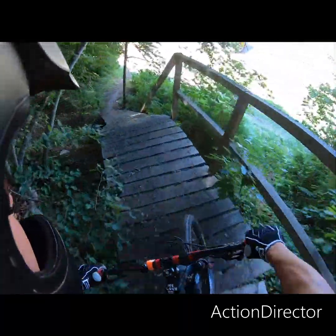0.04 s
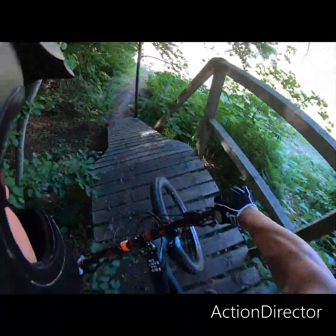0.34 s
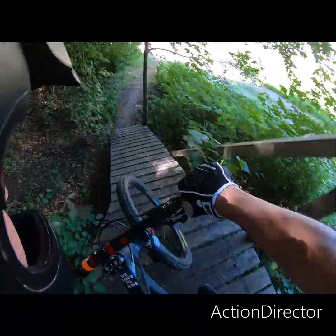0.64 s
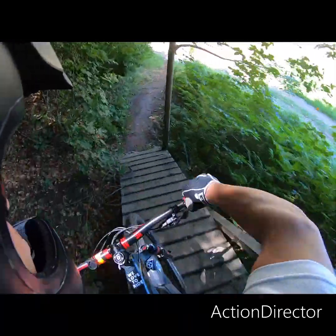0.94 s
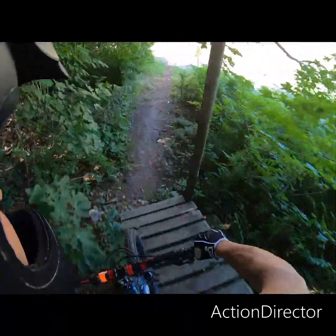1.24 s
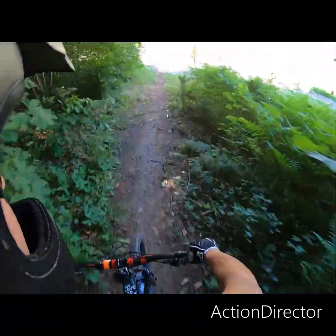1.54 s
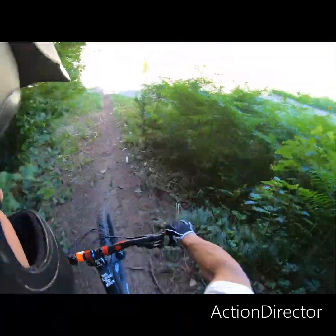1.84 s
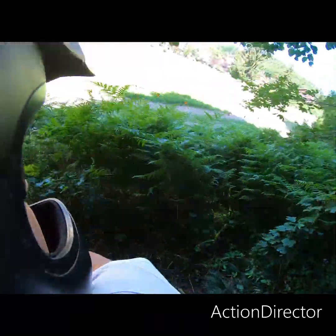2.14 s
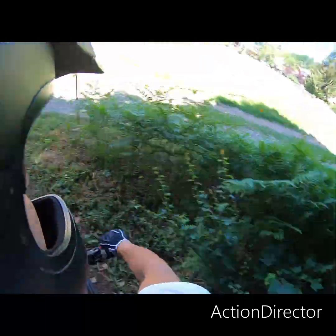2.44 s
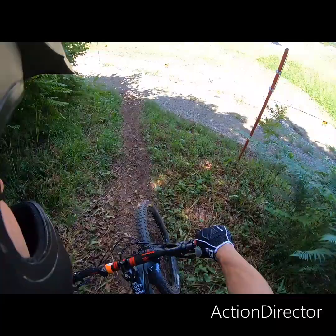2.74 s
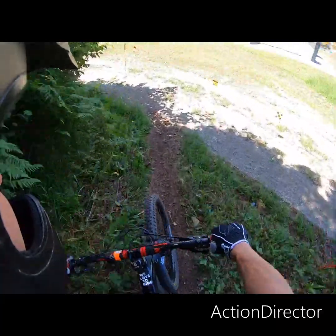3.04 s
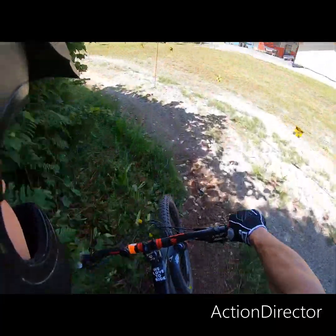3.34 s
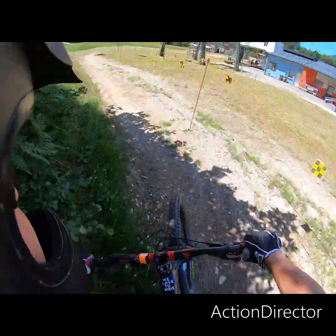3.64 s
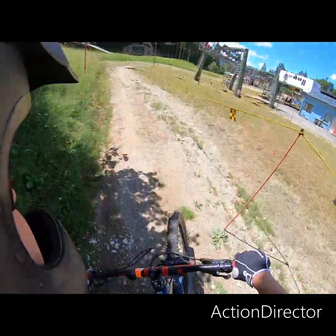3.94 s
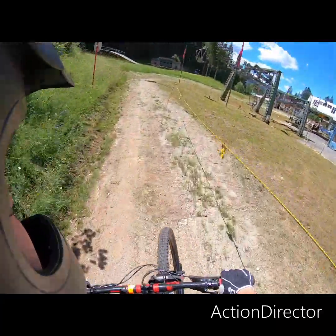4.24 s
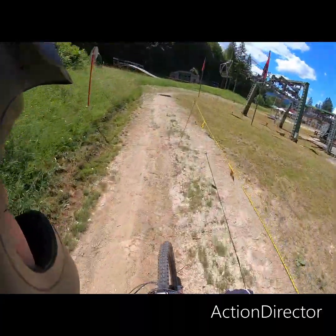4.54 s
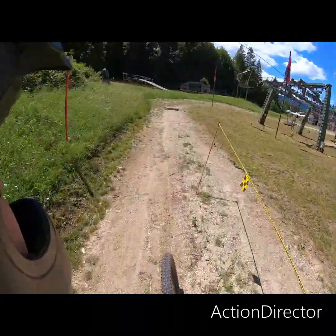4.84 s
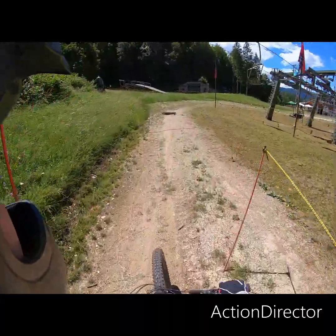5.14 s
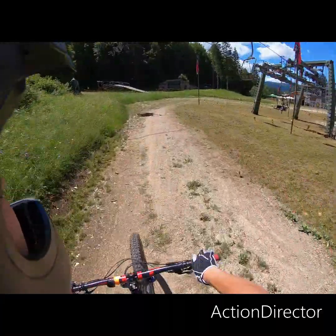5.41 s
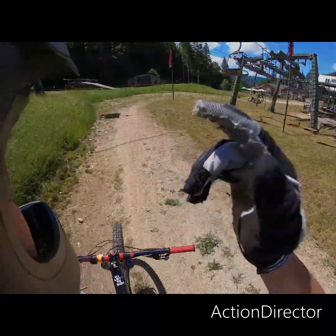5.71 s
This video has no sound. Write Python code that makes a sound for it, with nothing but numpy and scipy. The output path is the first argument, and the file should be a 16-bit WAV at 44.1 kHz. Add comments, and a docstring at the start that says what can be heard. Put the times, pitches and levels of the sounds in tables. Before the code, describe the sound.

Wind buffets a helmet microphone as a mountain bike knocks over wooden planks, clanks, then crunches along dirt and gravel.

```python
"""Wind buffets a helmet microphone while the tyres of a mountain bike hiss over a plank bridge.
The bike drops onto a dirt trail and runs out on gravel. Turbulent eddies thump, roar and rush,
higher as speed builds; the tread scrubs the ground and crunches grit. Boards and roots knock the
wheels, impacts ring the frame's metal and jangle the chain, and a few dry clicks come near the end."""
import sys
import numpy as np
from scipy import signal
from scipy.fft import rfft, irfft, next_fast_len
from scipy.io import wavfile
from scipy.ndimage import uniform_filter1d

SR = 44100
rng = np.random.default_rng(int(sys.argv[2]) if len(sys.argv) > 2 else 0)


def master(y):
    """Save y as 16-bit WAV."""
    cut = np.clip(np.atleast_2d(y).T, -1, 1)
    pcm = np.round(cut * 32767)  # scale
    wavfile.write(sys.argv[1], SR, pcm.astype(np.int16))


N = 258867
TIME = np.arange(N) / SR


def from_db(db):
    """Amplitude ratio of a level in decibels."""
    return 10 ** (np.asarray(db) / 20)


def rms_one(x):
    """Normalise to unit power."""
    return x / np.sqrt(np.mean(x ** 2) + 1e-20)


def in_time(rows):
    """Interpolate each column of a time curve at every sample."""
    s, *columns = np.transpose(rows)
    return [np.interp(TIME, s, c) for c in columns]


def colour(x, spectrum):
    """Spectral shaping to rms 1. Each row of a spectrum: frequency in Hz, relative density in dB."""
    hz, db = np.transpose(spectrum)
    size = next_fast_len(N)
    bins = np.maximum(np.fft.rfftfreq(size, 1 / SR), 1)
    gain = from_db(np.interp(np.log(bins), np.log(hz), db, right=-120))
    return rms_one(irfft(rfft(x, size) * gain, size)[:N])


def flutter(rate_hz, depth_db):
    """Random amplitude modulation: a gain of rms 1 that follows low-passed noise."""
    r = np.exp(-2 * np.pi * rate_hz / SR)
    slow = signal.lfilter([1], [1, -2 * r, r * r], rng.standard_normal(N + SR))[SR:]
    return rms_one(from_db(depth_db * np.clip(rms_one(slow), -2, 2)))


def airflow(spectrum, steady_s):
    """Stationary turbulence: noise whose power holds steady over spans longer than steady_s."""
    noise = colour(rng.standard_normal(N), spectrum)
    return noise / np.sqrt(uniform_filter1d(noise ** 2, int(steady_s * SR)) + 1e-6)


def glide(x, speed):
    """Reading a noise at a changing speed scales all its frequencies alike."""
    return np.interp(np.cumsum(speed) % N, np.arange(N), x)


def band(x, centre_hz, spread):
    """A band-pass resonance reaching a factor spread either side of its centre."""
    spread = max(spread, 1.02)
    edges = [centre_hz / spread, min(centre_hz * spread, .45 * SR)]
    return signal.sosfilt(signal.butter(1, edges, "band", fs=SR, output="sos"), x)


def low_pass(x, hz, order):
    """Attenuate everything above hz."""
    return signal.sosfilt(signal.butter(order, min(hz, .45 * SR), fs=SR, output="sos"), x)


def ring(x, hz, t60):
    """One damped mode, with the same power gain whatever its decay."""
    r, w = from_db(-60 / (t60 * SR)), 2 * np.pi * hz / SR
    return signal.lfilter([0, np.sin(w) * np.sqrt(1 - r * r)], [1, -2 * r * np.cos(w), r * r], x + 1e-18)


def snap(hz, spread):
    """One hard contact: the impulse response of a heavily damped resonance; peak 1."""
    pulse = band(band(signal.unit_impulse(SR // 30), hz, spread), hz, spread)
    pulse = low_pass(pulse, hz * 2, order=2)
    return pulse / abs(pulse).max()


def add(out, s, sound):
    """Superpose a sound from time s."""
    start = max(round(s * SR), 0)
    out[start:start + len(sound)] += sound[:N - start]


def strike(blows, modes, t60, crack_db, octave_db, attack_s):
    """Modal excitation: chattering contacts crack and ring the modes nearest their brightness."""
    out, t = np.zeros(N), TIME[:SR // 3]
    for s, db, bright_hz, chatter_s in blows:
        chatter = (1 - np.exp(-t / attack_s)) * np.exp(-t / chatter_s)
        contact = rng.standard_normal(len(t)) * chatter
        rings = np.zeros(len(t))
        for hz, mode_db in modes:
            octaves_away = abs(np.log2(hz / bright_hz))
            rings += from_db(mode_db - octave_db * octaves_away) * rms_one(ring(contact, hz, t60))
        crack = from_db(crack_db) * rms_one(band(contact, bright_hz, spread=1.45))
        sound = low_pass(rms_one(rings) + crack, 7750, order=6)
        add(out, s, from_db(db) * sound * np.sqrt(np.mean(chatter ** 2)))
    return out


def ground():
    """The surface sets the excitation; its properties blend as the wheels cross to the next stretch."""
    # Each row: start in seconds, loose stones per second, their level in dB, crunch in dB, extra
    # buffeting from the shaken head in dB. Three stretches of bridge come first, then dirt, grass,
    # loose gravel, packed gravel and sand.
    stretches = [(0, 340, -46, -41, -9.5), (0.579, 130, -48, -53, -0.5), (.95, 210, -54, -39.5, 2),
                 (1.26, 140, -54, -47, 1), (2.15, 99, -54, -66, 0), (2.78, 350, -47, -35, -0.5),
                 (3.55, 510, -50.5, -67, -6), (4.75, 170, -67, -48.5, -2.5)]
    s, *columns = np.transpose(stretches)
    blend_s = 0.037
    crossed = np.clip((TIME - s[1:, None]) / blend_s + .5, 0, 1)
    return [c[0] + np.diff(c) @ crossed for c in columns]


def wind():
    """Turbulent cascade: large eddies buffet the microphone, ever smaller ones roar, swirl and rush."""
    # Each row: time in seconds, level of the low roar in dB, strength of the fast flow in dB.
    strength = [(0.0, -29, -44), (0.06, -27, -42.5), (0.27, -34, -42.5), (0.43, -28, -40.5),
                (0.6, -28.5, -51), (0.8, -26.5, -47.5), (0.96, -20.5, -32), (1.06, -32, -32.5),
                (1.24, -33, -32), (1.275, -30, -47), (1.32, -32.5, -40), (1.39, -46, -59),
                (1.86, -39, -48.5), (1.88, -35, -31), (2.02, -30.5, -31), (2.07, -40, -48),
                (2.115, -28, -41), (2.18, -36.5, -49.5), (2.25, -22, -33.5), (2.298, -15, -27.5),
                (2.315, -30, -41), (2.35, -21.5, -48), (2.4, -40, -56), (2.52, -30, -55),
                (2.565, -37.5, -50), (2.595, -25, -34), (2.74, -22.5, -33.5), (2.85, -30.5, -33),
                (3.06, -25, -29), (3.24, -32.5, -30), (3.33, -26.5, -30.5), (3.55, -30.5, -30),
                (3.61, -28.5, -32), (3.68, -27, -29.5), (3.82, -26, -27.5), (3.92, -26, -33),
                (4.16, -22, -29.5), (4.21, -32.5, -32.5), (4.45, -23, -29.5), (4.61, -22, -29.5),
                (4.76, -25, -30), (4.9, -22, -39.5), (5.0, -26.5, -47), (5.1, -31.5, -46),
                (5.21, -29, -45.5), (5.46, -53.5, -53), (5.63, -42.5, -63), (5.715, -42, -56),
                (5.75, -40.5, -33.5), (5.87, -29, -48)]
    # Speed and the turn of the head move the rush. Each row: time in seconds, centre in Hz.
    rush_pitch = [(0, 559.6), (1.2, 581.7), (2.28, 621.7), (2.6, 490), (2.85, 606.7), (3.25, 670),
                  (3.52, 651), (3.62, 439.4), (3.69, 439.3), (3.82, 550.3), (4.2, 495.6), (4.45, 574.6),
                  (4.73, 554), (4.85, 431.2), (4.98, 370), (5.2, 450), (5.87, 499.7)]
    # Eddy spectra, largest eddies first. Each row: frequency in Hz, relative density in dB.
    buffet_spectrum = [(12, -46), (25, -5.5), (42, 1), (65, 4.5), (85, 3), (115, -1), (170, -22.5),
                       (300, -22), (600, -70)]
    roar_spectrum = [(70, -10), (110, -2), (150, 1), (200, -1.5), (260, -4.5), (330, -15), (480, -20),
                     (1000, -81)]
    swirl_spectrum = [(180, -17), (270, 0), (350, -0.5), (440, -6), (550, -9), (750, -22.5), (1500, -51)]
    rush_spectrum = [(300, -8.5), (450, -5), (580, 0), (720, -5.5), (900, -12.5), (1200, -21.5),
                     (1700, -35.5), (3000, -46), (8000, -81)]
    roar_db, flow_db = in_time(strength)
    rush_hz, = in_time(rush_pitch)
    _, _, _, shaken_db = ground()
    roar_over_cruise_db, flow_over_cruise_db = roar_db + 30.5, flow_db + 37
    # buffeting grows with the roar and eases when the flow is fast and even
    buffet_db = -29.5 + shaken_db + 0.7 * roar_over_cruise_db - 0.16 * flow_over_cruise_db
    buffet = from_db(buffet_db) * airflow(buffet_spectrum, steady_s=0.094)
    buffet *= flutter(rate_hz=7.1, depth_db=2.5)
    roar = from_db(roar_db) * airflow(roar_spectrum, steady_s=0.052)
    swirl_db = 0.3 * roar_db + 0.7 * flow_db - 1.35  # middle-sized eddies follow both large and small
    swirl = from_db(swirl_db) * airflow(swirl_spectrum, steady_s=0.0206)
    rush = glide(airflow(rush_spectrum, steady_s=0.018), rush_hz / 580)  # the spectrum peaks at 580 Hz
    rush *= from_db(-38 + 1.16 * flow_over_cruise_db)
    small_eddies = (swirl + rush) * flutter(rate_hz=330, depth_db=0.4)
    return buffet + (roar + small_eddies) * flutter(rate_hz=32, depth_db=2.06)


def tyres():
    """Friction noise: knobs scrub out a hiss and a spray of dust; faint narrow tones waver in the hiss."""
    # Each row: time in seconds, relative levels of hiss and of spray in dB.
    levels = [(0.0, -41.5, -59.5), (0.39, -39.5, -59), (0.75, -41.5, -60), (1.01, -42, -64),
              (1.21, -45, -66.5), (1.75, -40, -61.5), (2.45, -46.5, -64), (3.22, -44, -70),
              (4.1, -44.5, -67), (5.05, -46.5, -71), (5.6, -46, -68.5), (5.87, -43, -65)]
    # Spectra of the scrubbing and the dust. Each row: frequency in Hz, relative density in dB.
    hiss_spectrum = [(400, -23), (800, -8), (1300, 3), (1900, 1.5), (2300, 3.5), (2550, 2.5), (3100, -1.5),
                     (3700, -3.5), (4200, -6.5), (5400, -10), (6500, -17.5), (8000, -21.5), (14000, -60)]
    spray_spectrum = [(4000, -9), (5400, 9.5), (6800, -2.5), (7700, 2.5), (8900, 2.5), (9450, -3),
                      (10200, 1), (11000, -5.5), (12000, -9), (13000, -16), (13900, -17), (14600, -32)]
    # Each row: frequency in Hz, time to decay by 60 dB in seconds, level relative to the hiss in dB.
    hiss_resonances = [(2240, 0.028, -15.5), (2646, 0.0082, -13), (3200, 0.01, -14.5), (3730, 0.012, -16.5),
                       (4690, 0.0028, -18), (5160, 0.0027, -34)]
    hiss_db, spray_db = in_time(levels)
    hiss = colour(rng.standard_normal(N), hiss_spectrum) * flutter(rate_hz=28, depth_db=0.94)
    tones = np.zeros(N)
    for hz, t60, db in hiss_resonances:
        tone = band(ring(rng.standard_normal(N), hz, t60), hz, spread=1.6)
        tones += from_db(db) * rms_one(tone) * flutter(rate_hz=6.7, depth_db=6.5)
    spray = colour(rng.standard_normal(N), spray_spectrum) * flutter(rate_hz=28, depth_db=1.3)
    return from_db(hiss_db + 0.57) * (hiss + tones) + from_db(spray_db + 8.5) * spray


def grit():
    """Shot noise: stones snap under the tread at random, each with its own size and pitch."""
    # Each row: frequency in Hz, gain in dB.
    stone_spectrum = [(400, -31), (900, 1.5), (1500, 2), (2500, 7), (3600, -9.5), (5500, -28), (7000, -29),
                      (10000, -16), (14000, -47)]
    stones_per_s, grit_db, _, _ = ground()
    sizes = from_db(1.6 * np.minimum(rng.exponential(1, N), 3.5)) * rng.choice([-1, 1], N)
    impacts = sizes * (rng.random(N) < stones_per_s / SR)
    pitches_hz = np.geomspace(800, 7000, 16)
    pitch_index = rng.integers(0, len(pitches_hz), N)
    rings = sum(ring(impacts * (pitch_index == k), hz, t60=9 / hz) for k, hz in enumerate(pitches_hz))
    return from_db(grit_db) * colour(rings, stone_spectrum)


def crunch():
    """Granular friction: countless small stones grind together under the tread in uneven clumps."""
    # Each row: frequency in Hz, relative density in dB.
    gravel_spectrum = [(400, -2), (750, 1.5), (1050, 1), (1400, -4.5), (1900, -13), (2800, -17),
                       (5000, -51), (10000, -59)]
    _, _, crunch_db, _ = ground()
    grains = rng.standard_normal(N) * (rng.random(N) < 3000 / SR)  # 3000 contacts a second
    return from_db(crunch_db) * colour(grains, gravel_spectrum) * flutter(rate_hz=21, depth_db=3.0)


def knocks():
    """Impact and crackle: most rows are boards, roots and stones striking the wheels, a few are sharp crackles
    of the wind; each is a snap, then dense, damped modes round one pitch."""
    # Each row: start in seconds, relative level in dB, centre in Hz, decay time in seconds.
    blows = [(0.0685, -16.5, 1300, 0.0055), (0.2128, -13, 560, 0.0079), (0.41, -24.5, 555, 0.011),
             (.452, -28, 557, .014), (.652, -26, 400, .005), (.747, -23.5, 547, 0.0027),
             (.918, -27, 900, 0.0036), (1.159, -20, 1380, 0.02), (1.163, -19, 1360, 0.023),
             (1.171, -22, 1700, 0.0053), (1.671, -27, 397, 0.0065), (1.674, -22, 1840, 0.0097),
             (1.873, -22, 450, 0.038), (1.8756, -19, 1400, 0.009), (1.883, -17.5, 1550, 0.0083),
             (1.899, -24, 990, 0.014), (1.916, -20, 1450, 0.016), (1.951, -25.5, 1210, 0.056),
             (2.106, -24.5, 463, 0.0082), (2.256, -17, 674, 0.0032), (2.617, -22, 535, 0.013),
             (3.073, -17, 1300, 0.0022), (3.703, -17.5, 660, 0.0034), (3.743, -20, 681, 0.0032),
             (3.7922, -18.5, 1530, 0.0054), (4.616, -18, 799, 0.0027)]
    out, t = np.zeros(N), TIME[:SR // 3]
    for s, db, centre_hz, decay_s in blows:
        shake = (1 - np.exp(-t / 0.00028)) * np.exp(-t / decay_s)
        body = band(rng.standard_normal(len(t)) * shake, centre_hz, spread=1.31)
        body = low_pass(body, centre_hz * 1.48, order=2)
        add(out, s, from_db(db - 4.5) * rms_one(body) * np.sqrt(np.mean(shake ** 2)))
        add(out, s, from_db(db - 0.5) * snap(centre_hz, spread=1.6))
    return out


def clanks():
    """Free vibration: chain and frame meet with a snap, the metal rings on and the links jangle."""
    # Each row: start in seconds, level in dB, brightness in Hz, decay time of the chatter in seconds.
    blows = [(0.071, -30, 4750, 0.0024), (1.158, -53, 4300, 0.014), (1.674, -36, 4020, .008),
             (1.882, -21.5, 2750, 0.0044), (1.904, -30, 3340, 0.006), (1.917, -41, 3000, .003),
             (1.939, -30, 4030, 0.004), (1.9505, -12.5, 3900, 0.0023), (1.969, -37, 4300, .004),
             (3.793, -35, 2800, 0.0021)]
    # Each row: frequency in Hz, relative level in dB.
    frame_modes = [(1600, 12), (2000, 6), (2800, 26), (3700, 3), (3860, 16), (4000, 14), (4200, 6),
                   (4560, 2), (5350, 16), (6800, 11), (7400, 11), (8600, 2)]
    # Each row: frequency in Hz, relative density in dB.
    link_spectrum = [(1200, -6), (2000, 2), (2800, -0.5), (3300, -2), (3900, 2), (4450, 1), (5000, -5),
                     (5500, -10), (7000, -10), (10000, -21.5), (13000, -47), (14200, -43)]
    rattle_db, rise_s, decay_s, touches_per_s = -15.5, 0.002, 0.032, 4500
    touches = rng.choice([-1, 1], N) * (rng.random(N) < touches_per_s / SR)
    hits = strike(blows, frame_modes, t60=0.022, crack_db=-13.5, octave_db=21, attack_s=0.000087)
    tail = strike(blows, frame_modes, t60=0.11, crack_db=-30, octave_db=10, attack_s=0.0001)
    shaking = np.zeros(N)
    for s, db, bright_hz, _ in blows:
        add(hits, s, from_db(db - 5.5) * snap(bright_hz, spread=1.09))
        onset = np.clip((TIME - s) / rise_s, 0, 1)
        shaking += from_db(db + rattle_db) * onset * np.exp(-abs(TIME - s) / decay_s)
    return hits + from_db(-10) * tail + shaking * colour(touches, link_spectrum)


def scuffs():
    """Band-limited friction noise: broad scuffs through sand and narrow whirs swell and fade."""
    # Each row: peak time in seconds, level in dB, half length in seconds, centre in Hz, spread factor.
    swells = [(0.424, -51, .08, 2550, 1.03), (0.554, -47, 0.016, 3100, 1.07), (0.801, -47, 0.1, 2550, 1.05),
              (2.42, -52, 0.035, 2570, 1), (3.483, -48, 0.046, 4400, 1.33), (4.0, -58, .09, 3680, 1.03),
              (4.443, -55, .015, 5500, 1.4), (4.517, -48, 0.1, 2380, 1.06), (4.746, -56, .018, 8000, 1.14),
              (5.284, -47, 0.079, 2880, 1.09), (5.303, -56, 0.032, 6290, 1.34),
              (5.346, -38, 0.041, 303, 1.19), (5.582, -49.5, 0.11, 2730, 1.1),
              (5.813, -46, 0.022, 2185, 1.04)]
    out, t = np.zeros(N), TIME[:SR]
    middle = t[-1] / 2
    for s, db, half_s, centre_hz, spread in swells:
        scuff = band(band(rng.standard_normal(len(t)), centre_hz, spread), centre_hz, spread)
        sound = from_db(db) * rms_one(scuff) * np.exp(-.5 * ((t - middle) / half_s) ** 2)
        before_start = max(round((middle - s) * SR), 0)
        add(out, s - middle, sound[before_start:])
    return out


def thumps():
    """As the head is jolted, one eddy hits the microphone: a pressure peak between shallow troughs."""
    # Each row: peak time in seconds, relative level in dB, pitch in Hz.
    eddies = [(.653, -9, 96), (0.748, -18, 110), (0.773, -14, 55), (0.808, -8, 75), (.915, -11, 85),
              (.967, -7.5, 69.6), (1.008, -10, 100), (1.333, -14, 75), (1.883, -12.5, 150),
              (2.023, -14, 95), (2.109, -16.5, 131), (2.278, -9.5, 159), (2.298, -4, 153),
              (2.443, -16, 109), (2.617, -7, 129), (2.667, -9, 125), (2.745, -21, 190), (2.836, -10, 91),
              (2.919, -13, 130), (2.991, -6, 62), (3.022, -3.5, 137), (3.058, -14, 80), (3.15, -11.5, 75),
              (3.178, -12, 140), (3.315, -12, 120), (4.154, -23, 110), (4.865, -10.5, 72),
              (5.748, -5.5, 83), (5.761, -18, 140), (5.786, -8, 145.6)]
    pressure = np.zeros(N)
    for s, db, hz in eddies:
        u = np.pi * hz * (TIME - s)
        pressure += from_db(db) * (1 - 3 * u ** 2) / (1 + u ** 2) ** 3
    return low_pass(pressure, 580, order=2)


def gusts():
    """Bursts of turbulence: jolts and turns of the head throw swells of air across the microphone."""
    # Each row: peak time in seconds, relative level in dB, half length in seconds, upper edge in Hz.
    swells = [(0.788, -15, 0.057, 127), (.921, -16, 0.012, 161), (1.004, -13.5, 0.03, 140),
              (1.327, -14.5, 0.016, 131), (1.89, -17, 0.009, 117), (2.006, -24, 0.013, 565),
              (2.344, -20, 0.0049, 260), (2.517, -16, 0.016, 151), (2.594, -13.5, 0.018, 152),
              (2.662, -19.5, 0.025, 217), (2.737, -17.5, 0.025, 200), (3.068, -14, 0.0074, 172),
              (4.14, -23.5, 0.016, 140), (4.301, -20.5, .04, 110), (4.52, -18, .014, 260),
              (4.603, -17, 0.014, 403), (5.147, -20.5, 0.012, 207), (5.753, -16.5, 0.011, 159),
              (5.79, -14, 0.012, 207), (5.827, -13.5, 0.0078, 265)]
    out, t = np.zeros(N), TIME[:SR // 4]
    middle = t[-1] / 2
    for s, db, half_s, edge_hz in swells:
        swell = np.exp(-.5 * ((t - middle) / half_s) ** 2)
        turbulence = band(rng.standard_normal(len(t)), edge_hz * 0.49, spread=1.68)
        air = low_pass(turbulence, edge_hz, order=3) * swell
        add(out, s - middle, from_db(db - 3.5) * rms_one(air) * np.sqrt(np.mean(swell ** 2)))
    return out


def hiss_duck():
    """Gain envelope: the hiss and grit dip briefly near 1.1 s and come back quickly."""
    at_s, depth_db, fade_s, return_s = 1.135, -10, 0.068, 0.013
    ease_s = np.where(TIME < at_s, fade_s, return_s)
    return from_db(depth_db * np.exp(-abs(TIME - at_s) / ease_s))


def pings():
    """Impulsive release: the tread pinches a larger stone and shoots it aside."""
    # Each row: start in seconds, peak level in dB, pitch in Hz.
    stones = [(1.643, -26, 2000), (1.696, -30, 3200), (1.719, -28, 2300), (2.678, -26, 1570),
              (2.762, -25.5, 1440), (2.813, -27, 2680), (3.064, -32, 2900), (3.118, -30, 3672),
              (3.267, -26, 1400), (3.335, -32, 1500), (3.432, -31, 1700), (3.482, -30, 1909),
              (3.59, -28, 3000), (3.866, -27, 1580), (3.909, -34, 3204), (4.434, -34, 4297),
              (4.852, -34, 1300), (5.266, -31, 3200)]
    out = np.zeros(N)
    for s, db, hz in stones:
        add(out, s, from_db(db) * snap(hz, spread=1.32))
    return out


def clicks():
    """Heavily damped modes make short dry clicks, as of a gear lever."""
    # Each row: start in seconds, level in dB, brightness in Hz, decay time of the chatter in seconds.
    blows = [(5.031, -18.5, 3050, 0.0031), (5.0375, -26, 2950, 0.0045), (5.105, -39, 5580, 0.0053),
             (5.756, -20.5, 6500, 0.0015), (5.757, -25.5, 1983, 0.005)]
    # Each row: frequency in Hz, relative level in dB.
    lever_modes = [(1250, -1), (1670, 7), (2110, 4), (2400, 3), (2830, 2), (3060, 7), (4540, 3), (4890, 0),
                   (5480, -1), (7600, -3), (8200, -5), (10100, 8)]
    return strike(blows, lever_modes, t60=0.014, crack_db=-7.0, octave_db=19, attack_s=0.0003)


def scene():
    """Free field: every source reaches the one microphone directly."""
    rolling = (tyres() + grit()) * hiss_duck() + crunch() + pings() + scuffs()
    bike = knocks() + clanks() + clicks()
    return (wind() + gusts() + thumps() + rolling + bike)[None]


def record(dry):
    """Soft saturation rounds the peaks and a steep low-pass removes the highest treble."""
    ceiling, stop_hz = 0.72, 15400
    rounded = ceiling * np.tanh(dry / ceiling)
    return signal.sosfilt(signal.cheby2(14, 70, stop_hz, fs=SR, output="sos"), rounded)


dry = scene()
out = record(dry)
master(out)
```